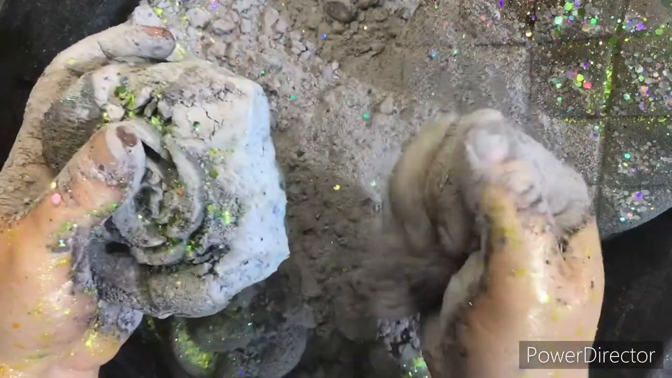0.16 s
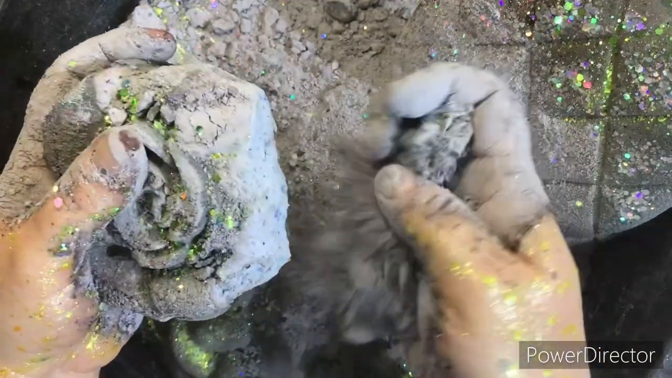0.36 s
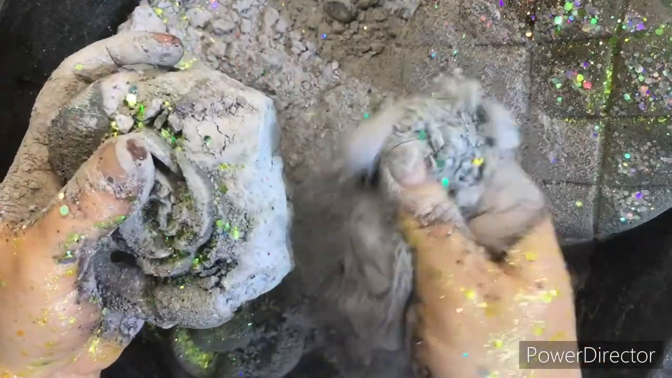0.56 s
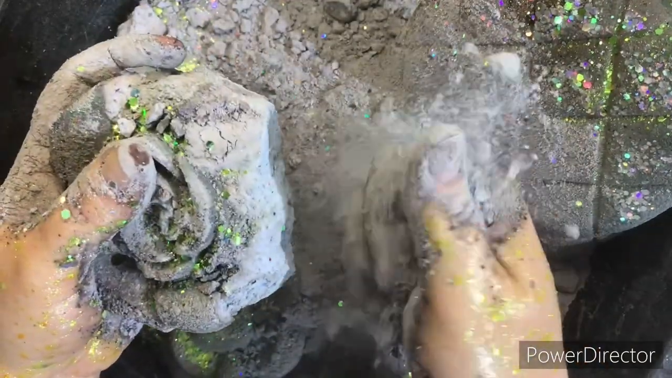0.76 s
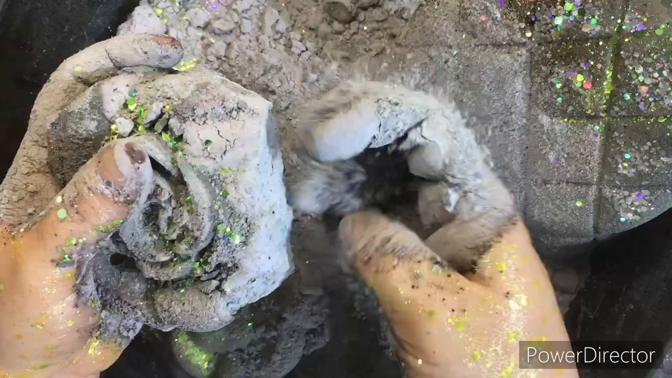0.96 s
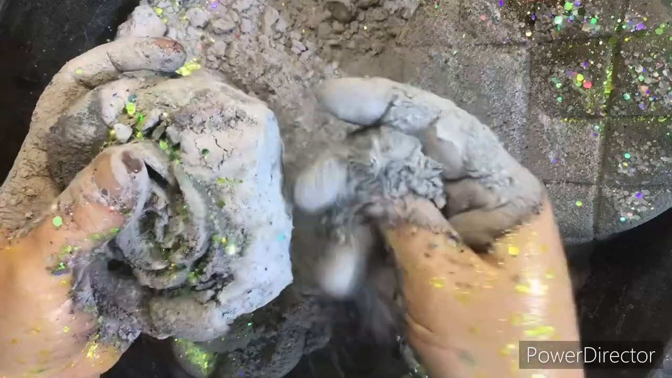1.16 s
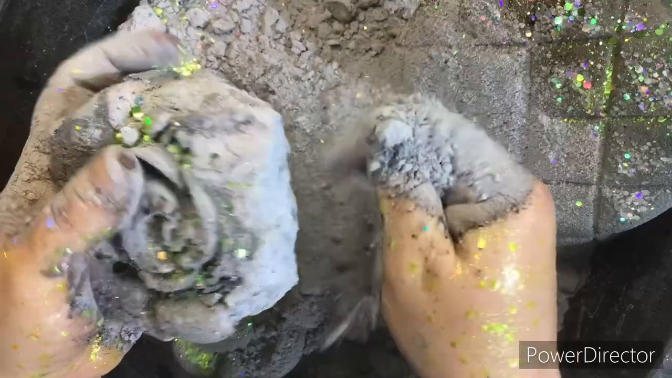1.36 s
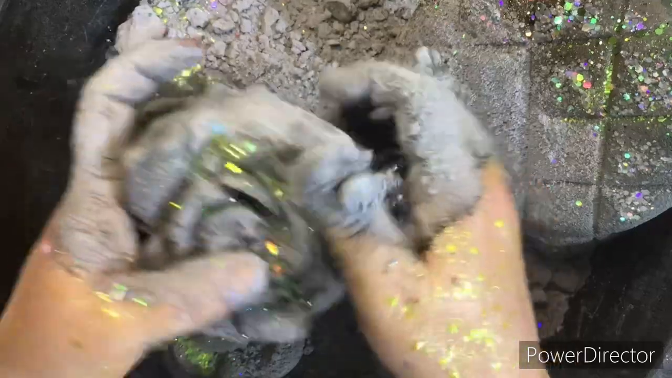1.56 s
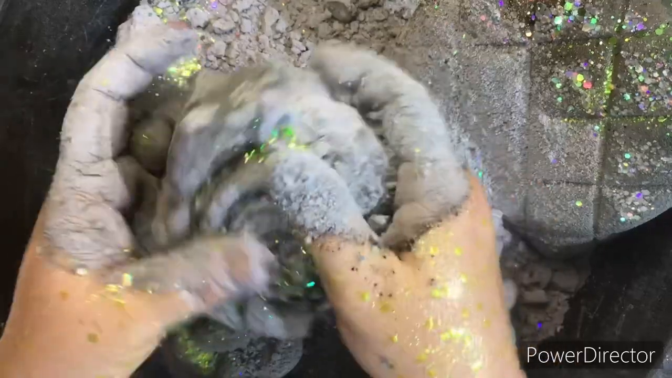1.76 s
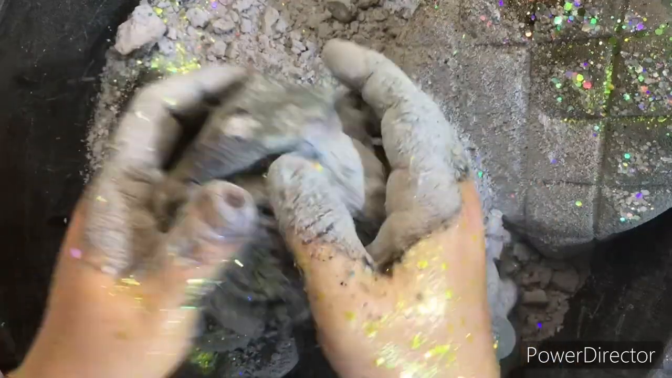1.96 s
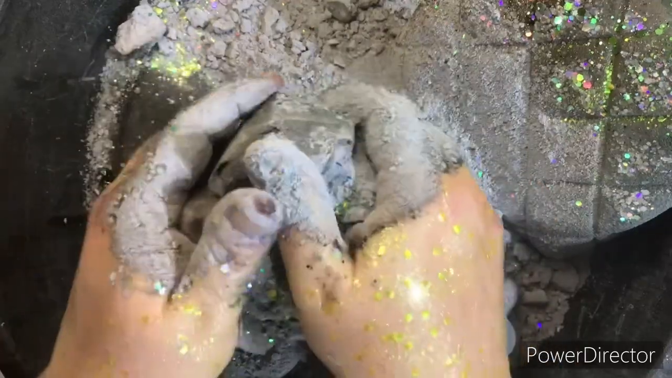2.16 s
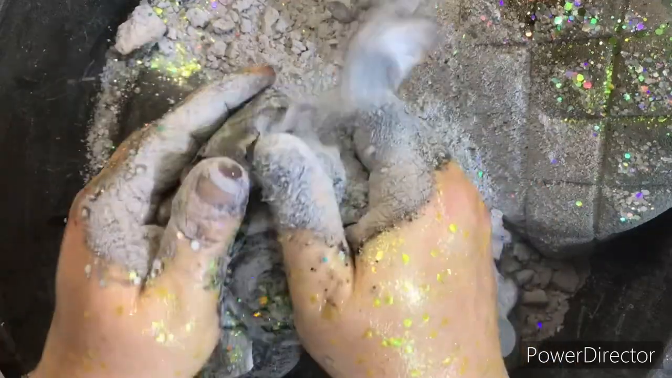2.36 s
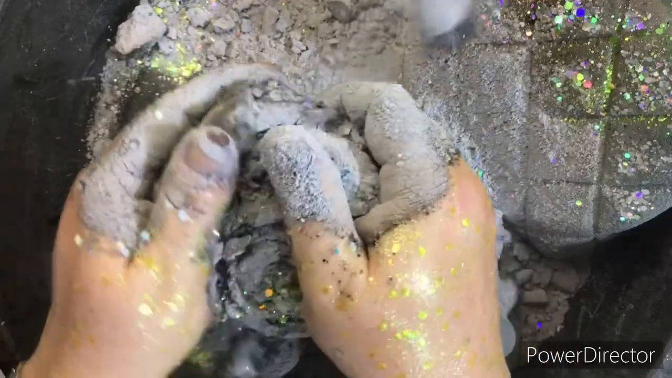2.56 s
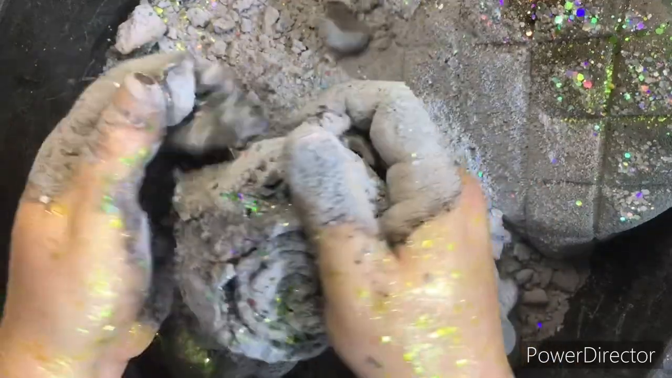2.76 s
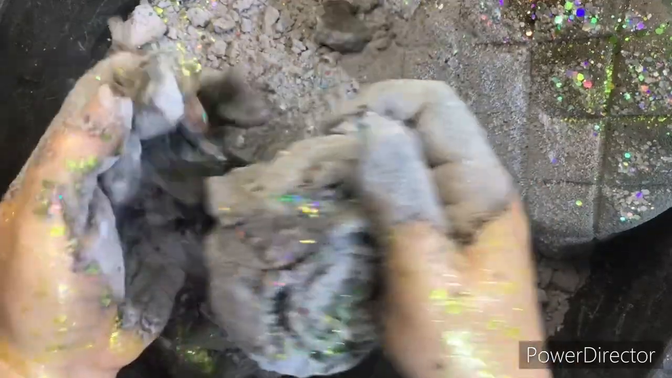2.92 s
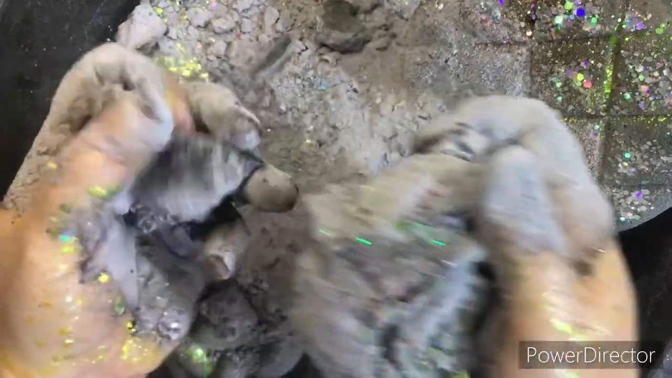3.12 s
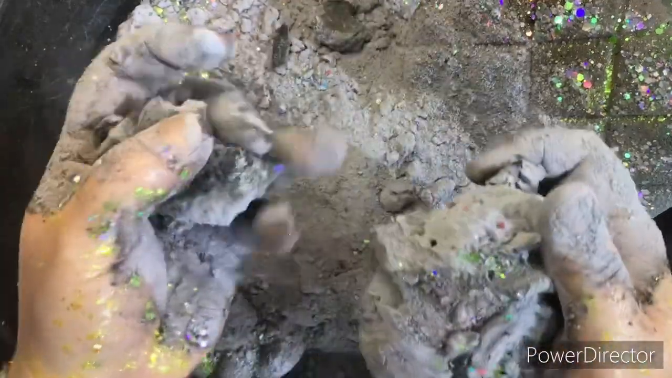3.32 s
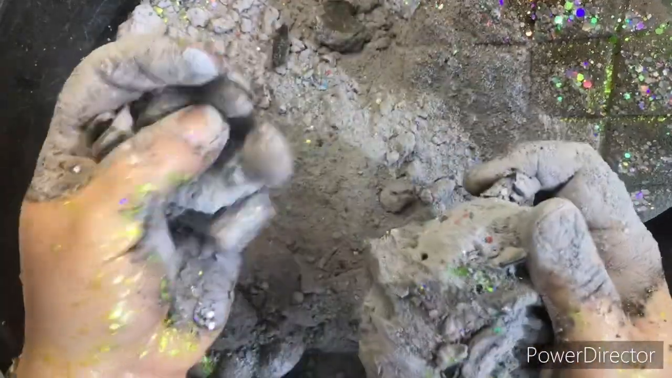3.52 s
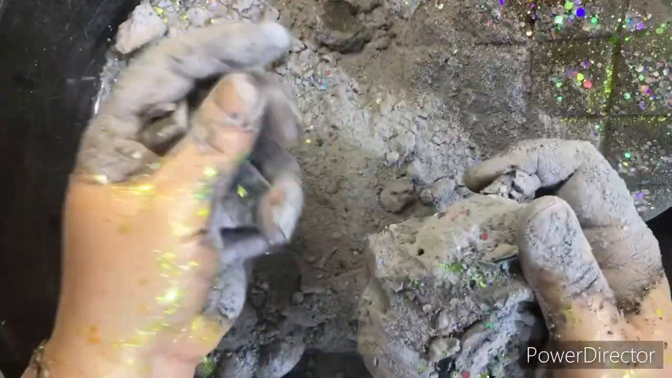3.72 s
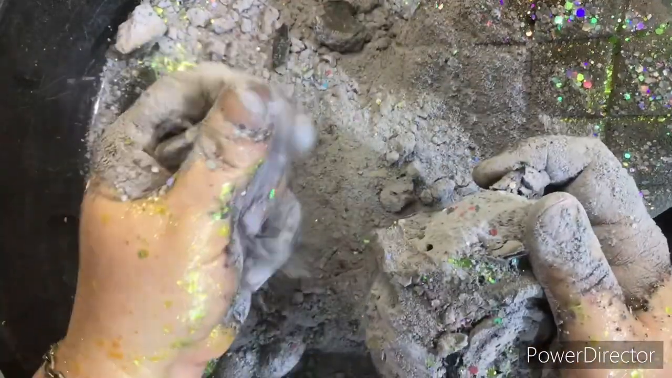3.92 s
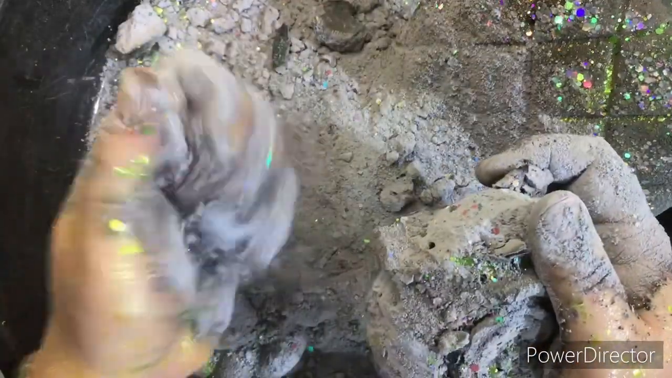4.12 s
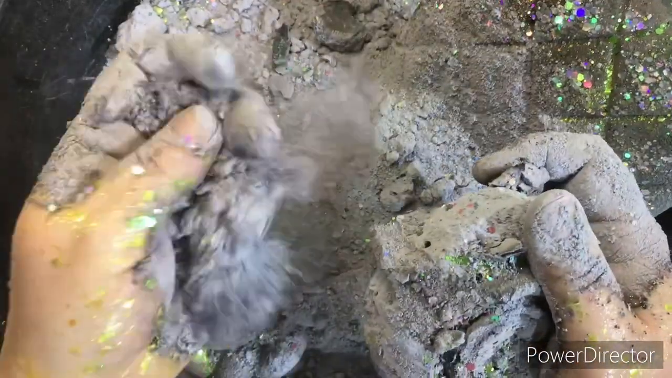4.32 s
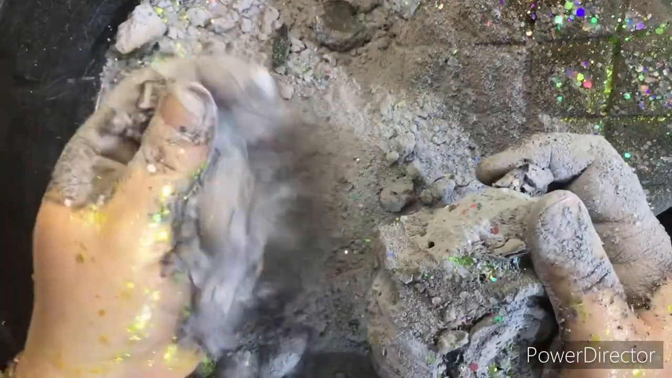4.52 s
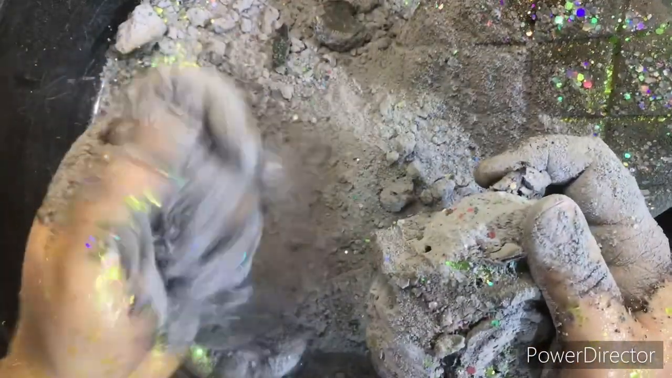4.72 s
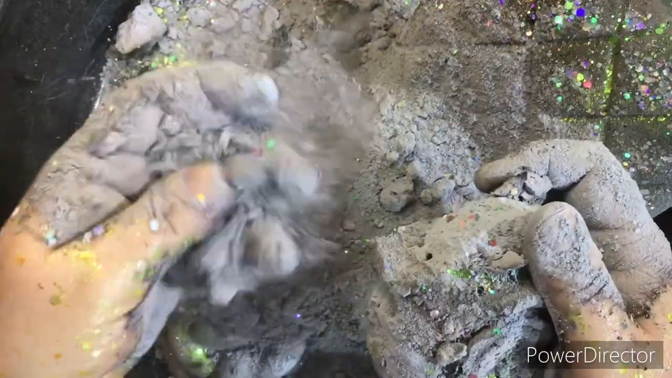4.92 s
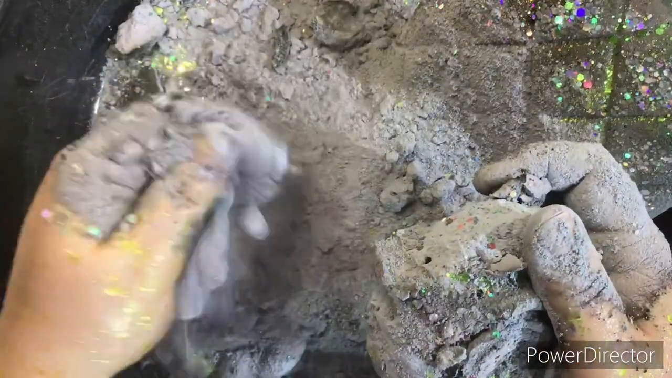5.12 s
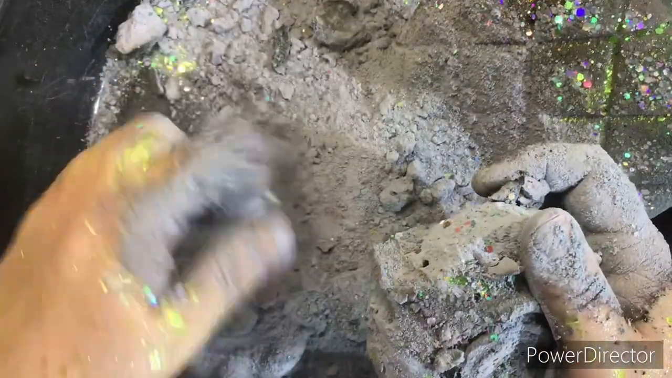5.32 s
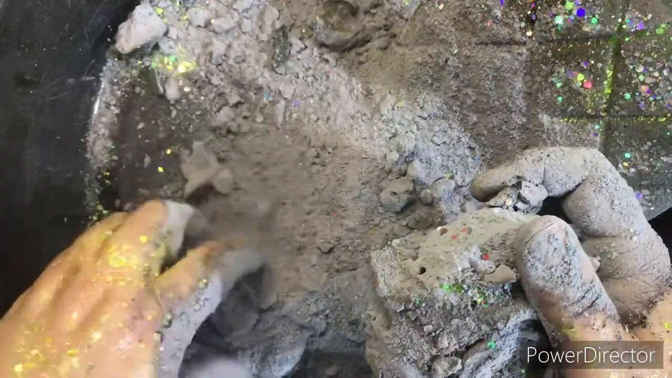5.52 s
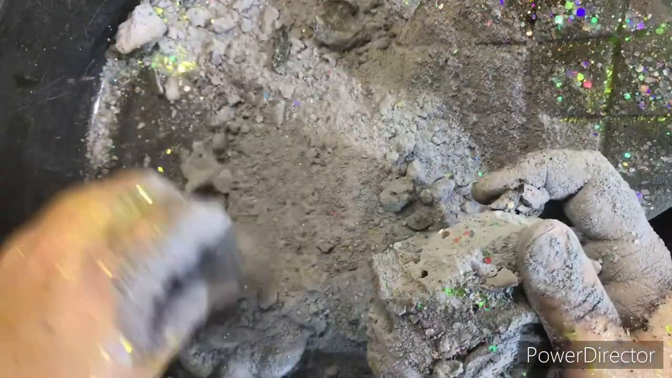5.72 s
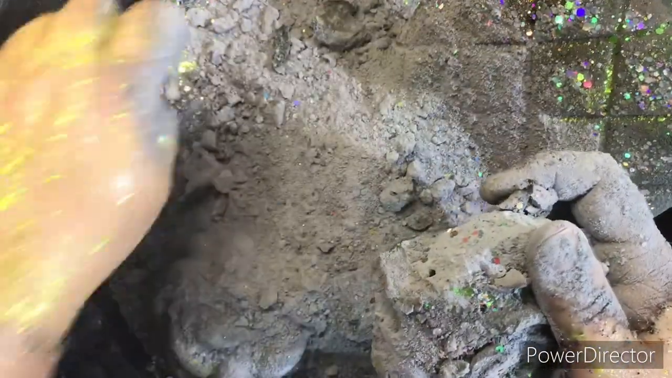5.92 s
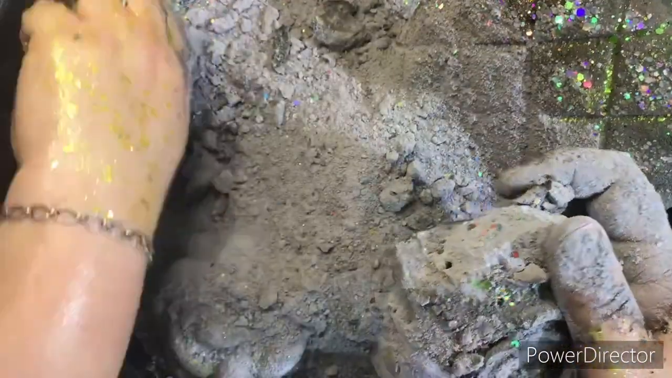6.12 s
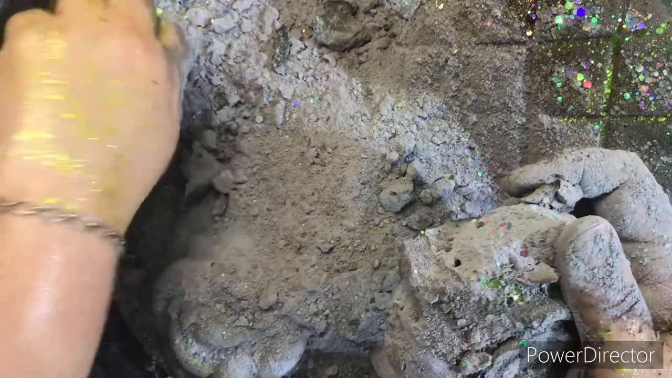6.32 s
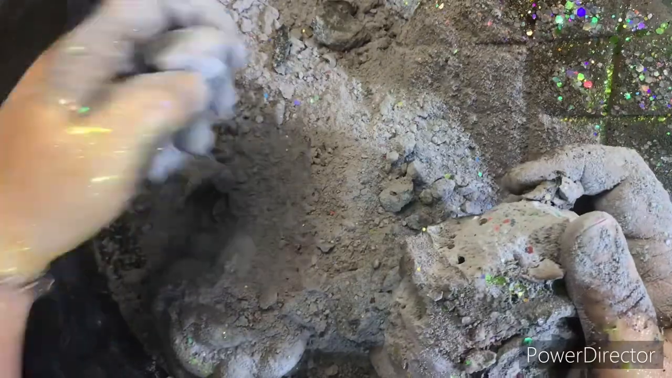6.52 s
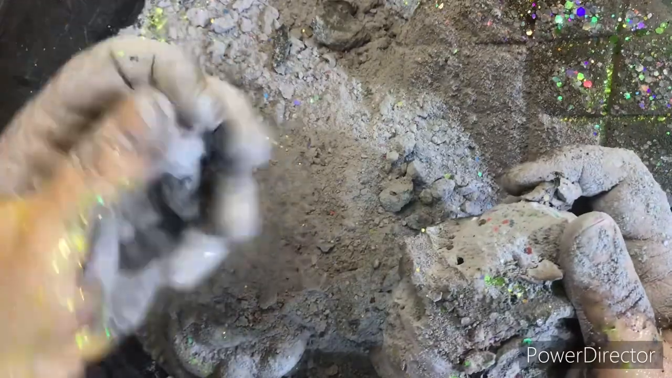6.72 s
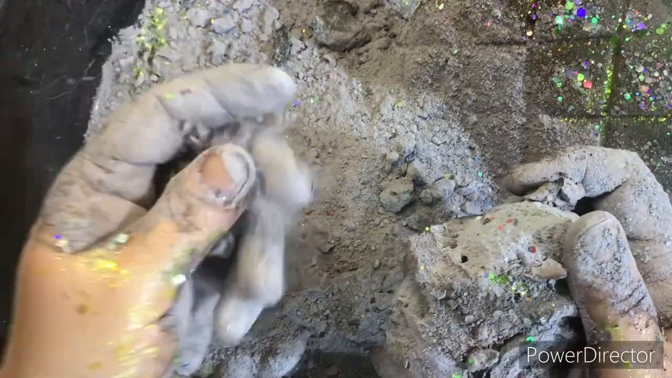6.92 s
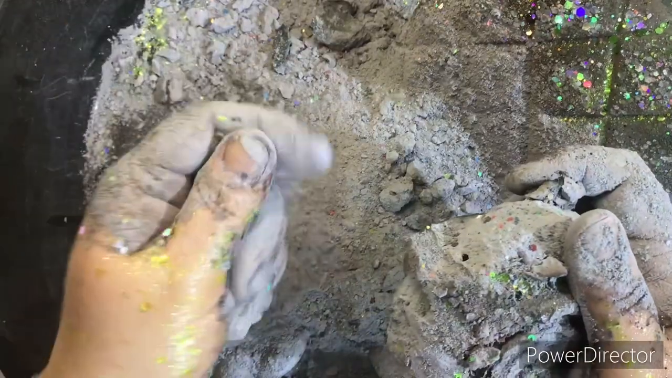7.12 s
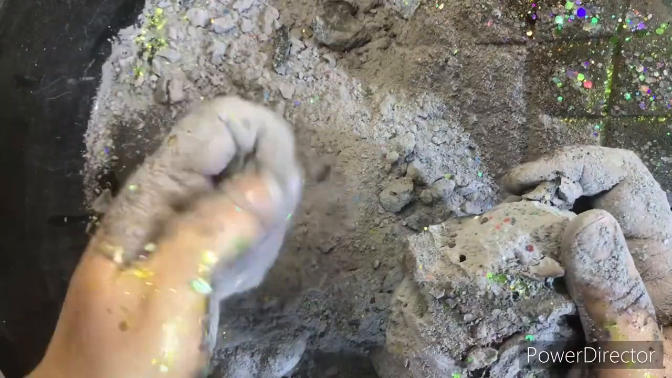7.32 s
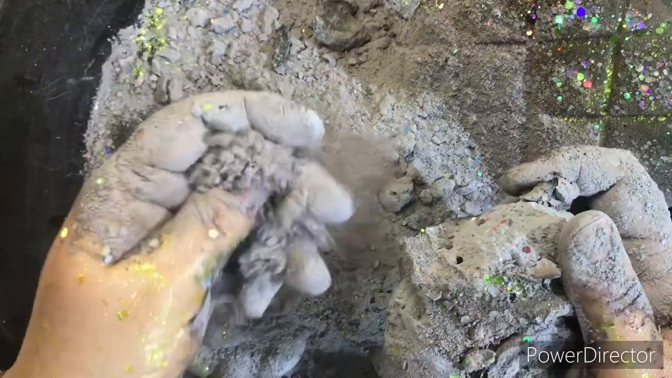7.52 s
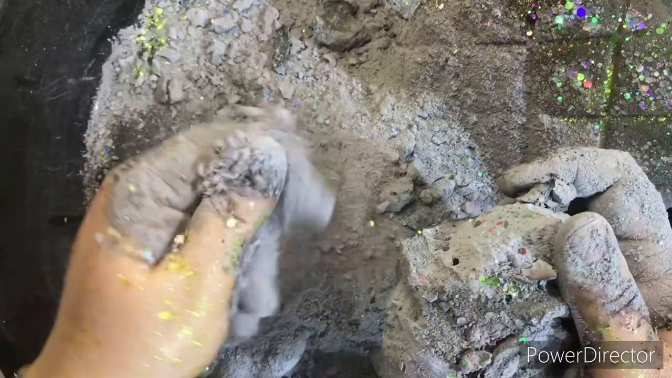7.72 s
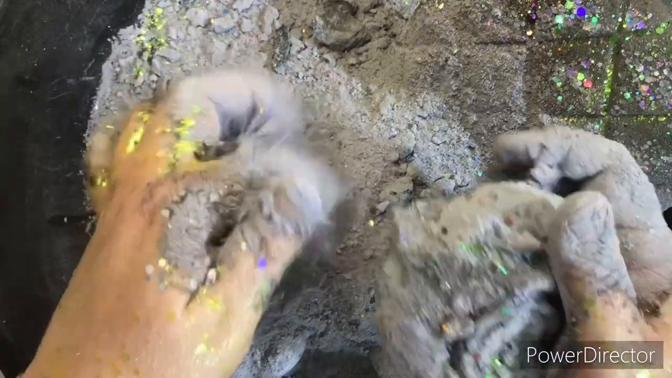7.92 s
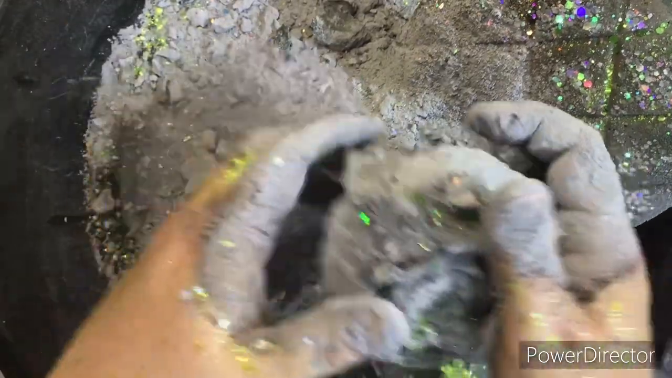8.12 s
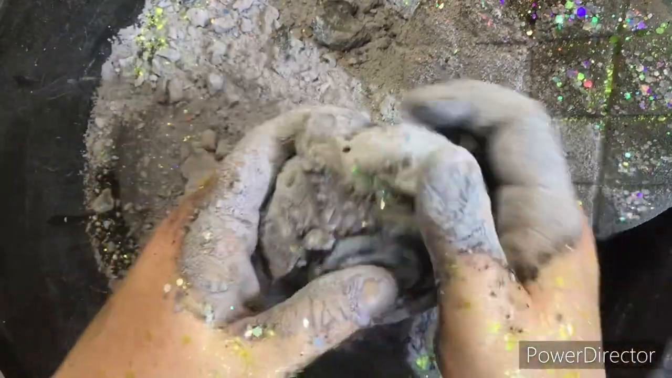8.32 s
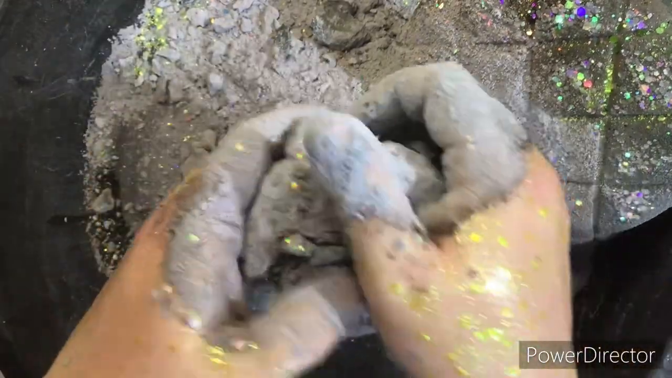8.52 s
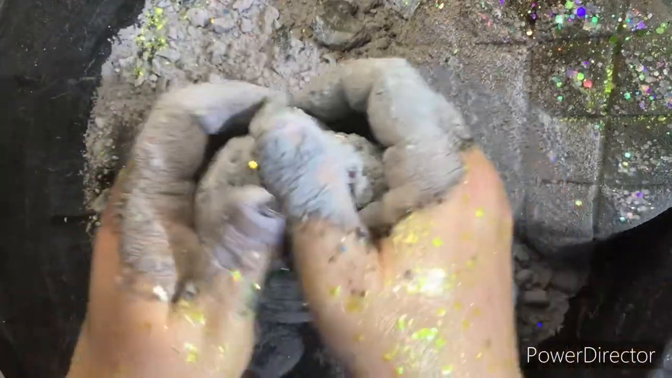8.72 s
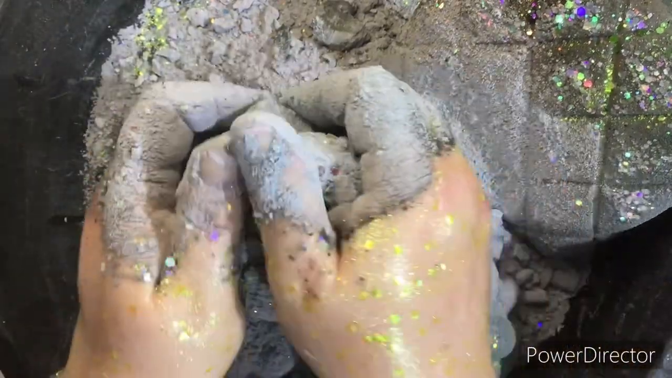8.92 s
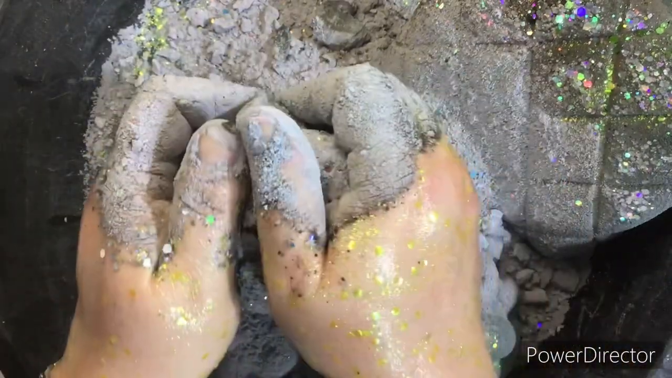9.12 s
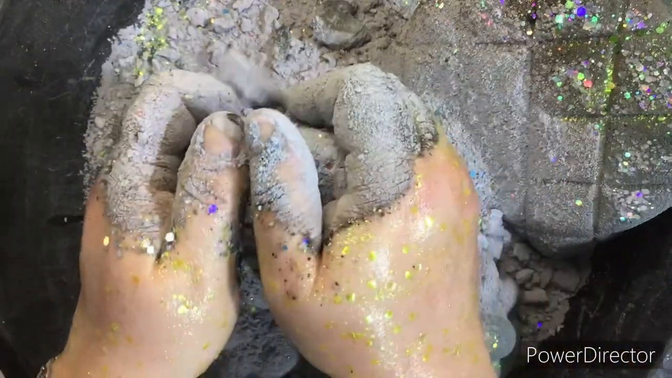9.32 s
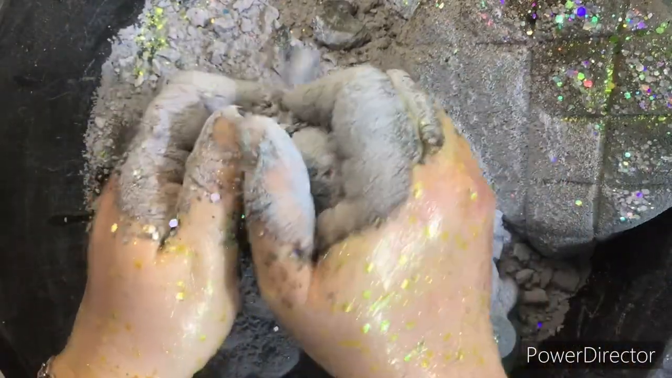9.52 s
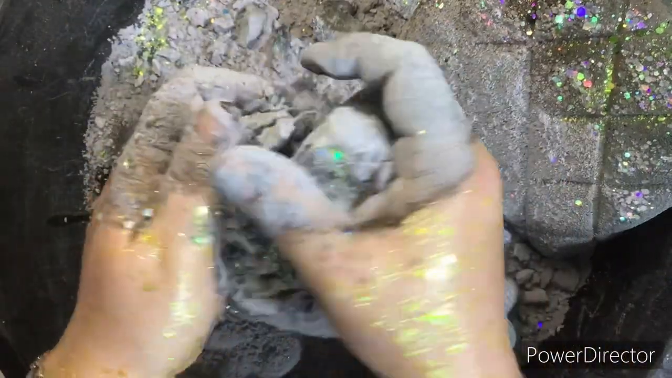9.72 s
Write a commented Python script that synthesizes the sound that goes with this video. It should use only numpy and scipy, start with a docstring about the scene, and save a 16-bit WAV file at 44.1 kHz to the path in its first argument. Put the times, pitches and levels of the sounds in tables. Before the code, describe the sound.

A close recording in a small, quiet room with a faint bassy background. From 0 to 2 seconds, hands squeeze dry chalk with soft gritty crunches, dull snaps around 0.45 and 1.3, and light finger swishes from 1.4. At about 2.5 a large lump breaks in a tight burst of very loud, clipped cracks, with a hollow tub boom; more strong cracks follow at 2.8 and 3.1, shedding crumbs, then a snap at 3.7. From 3.8 to 4.8 it is mostly gentle crumbling. Around 4.9 to 5.7, a longer squeeze crackles with sharper snaps near 5.2, 5.3 and 5.55. A low tub thump comes at 6.15. From 6.4 to 7.9, quiet powdery rubbing and pattering grains continue. Small crunches and swishes appear around 8 to 8.7, then near-quiet, before a brief cluster of clicks and a soft bump at 9.4 and fading crumbs.

```python
"""In a small quiet room, two hands crush dry chalk lumps over a plastic tub of powder, close to the microphone.
Each squeeze grinds crumbs, grit and powder, made of random ticks and noise in three colours. Lumps snap as
short filtered clicks, crunch in runs of ticks, and shed a trickle of debris; the largest ring. Bands of noise
make skin sliding on chalk and tub, high swishes and a low judder, and loose bits tick as short fading tones.
Knocks and leaning hands make the tub boom by ringing its low tones; a steady background lies beneath."""
import sys
import numpy as np
from scipy import signal
from scipy.fft import rfft, irfft, next_fast_len
from scipy.io import wavfile

SR = 44100
rng = np.random.default_rng(int(sys.argv[2]) if len(sys.argv) > 2 else 0)


def dump(signal):
    """Clip the signal to [-1, 1] and save it as 16-bit WAV at the path in sys.argv[1]."""
    limited = np.clip(np.atleast_2d(signal).T, -1, 1)
    pcm = np.round(limited * 32767).astype(np.int16)
    wavfile.write(sys.argv[1], SR, pcm)


N = 435266
TIME = np.arange(N) / SR

# Lumps snapping or landing. Each row: start in seconds, level over 10 ms in dB (before a small
# shared lift), pitch in Hz, dullness in dB lost per octave above the pitch.
LUMP_BREAKS = [(0.0467, -34, 2360.0, 10), (0.076, -39, 3020, 19), (0.13, -38.5, 4700.0, 14),
               (0.3942, -31.5, 2090, 41), (0.412, -36.5, 1700.0, 26.0), (0.4474, -23, 1760, 32.5),
               (0.48, -36, 560.0, 6.5), (0.5293, -29.5, 2150.0, 33), (0.5826, -30.5, 1580, 25.0),
               (0.6036, -28.5, 2230, 25), (0.7143, -33, 800.0, 9.5), (0.773, -39.0, 1300.0, 28.0),
               (0.8328, -36, 473, 7.5), (0.8592, -39, 4000.0, 18), (0.9046, -36.0, 2340.0, 16),
               (1.1134, -39.0, 1200.0, 11), (1.255, -33, 750.0, 15), (1.3123, -21.5, 1960.0, 31),
               (1.576, -35.5, 7600, 40), (1.6077, -39, 890, 8), (1.6641, -38, 4700, 39),
               (1.8255, -36.5, 6310.0, 21), (1.954, -32.5, 2250, 34), (1.9615, -26.5, 2660, 30),
               (2.296, -34.0, 3440.0, 11.5), (2.309, -27, 2780.0, 7), (2.322, -27, 5530, 12),
               (2.409, -35, 720.0, 5.0), (2.487, -10, 1200, 7.5), (2.495, -8.5, 510.0, 12),
               (2.507, -13.5, 1360.0, 11.5), (2.5452, -7.5, 860.0, 7.5), (2.5587, -12, 670, 4.5),
               (2.7566, -15.5, 590, 8.5), (2.8057, -20, 1860, 16.5), (2.8878, -32.5, 3320, 9.5),
               (2.9841, -15, 5600, 17.5), (3.028, -27, 5660, 10.5), (3.0824, -8.5, 2520, 9.5),
               (3.1458, -33, 840.0, 4), (3.1776, -28.5, 9410.0, 2.0), (3.49, -39, 826, 8.0),
               (3.576, -26, 6300.0, 7.5), (3.654, -21.0, 2380, 13.5), (3.6714, -16.5, 2200, 14),
               (3.6792, -27, 1930.0, 12.0), (3.7605, -35, 5850.0, 15), (4.3763, -39, 1160.0, 10.0),
               (4.4557, -37.5, 900, 3.0), (4.6588, -36, 2420.0, 16), (4.681, -37, 1880, 18),
               (4.844, -22.0, 2900, 19.5), (4.8854, -35.5, 4210.0, 15.5), (4.9339, -24.0, 1125, 2.0),
               (4.9906, -30.5, 1880.0, 6), (5.002, -31.5, 4970.0, 20), (5.0302, -35.0, 4700.0, 15),
               (5.072, -35.5, 1040.0, 19), (5.1505, -32, 3550.0, 34), (5.1616, -26.5, 2960.0, 16),
               (5.1849, -25, 2700, 51), (5.235, -33.5, 1670, 12.0), (5.3115, -15, 4460, 18),
               (5.3721, -29.5, 2450.0, 18), (5.408, -32, 1200.0, 0.5), (5.4545, -31, 5500.0, 26),
               (5.4916, -35.5, 320.0, 7), (5.5616, -19.5, 3600, 9.5), (5.694, -34, 3280, 11),
               (5.8175, -28.5, 1790, 16.5), (6.0198, -39.5, 5560, 14), (6.0834, -36.5, 2830.0, 13),
               (6.142, -33.5, 483, 18), (6.1614, -31.5, 2610.0, 16), (6.1796, -29, 6800, 33),
               (6.2925, -44, 480.0, 13), (6.379, -39.0, 3570.0, 5), (6.4168, -38, 7960.0, 28),
               (6.9103, -39, 3110.0, 10), (7.2244, -34, 1104, 16), (7.7291, -35, 2190, 16),
               (7.987, -31.5, 320.0, 0), (8.049, -35, 1700, 23), (8.0661, -23.5, 8250.0, 13),
               (8.662, -36, 2040.0, 35), (8.6693, -35.5, 1800.0, 18), (9.2379, -40, 7280.0, 44),
               (9.4035, -28.5, 3470.0, 14), (9.4184, -27, 1450.0, 11.5), (9.4249, -26, 1580.0, 9)]
# Bands of noise: skin sliding on chalk or along the tub; the two near 117 Hz are a low judder. # Each row:
# start in seconds, length in seconds, level at the middle in dB (before its unevenness), # centre in Hz, width
# as upper edge over centre (raised to 1.1 if smaller).
SKIN_SLIDES = [(.2, 0.23, -36, 117.4, 1.17), (.55, 0.36, -42, 116.5, 0.91),
               (1.39, 0.15, -39.5, 5650, 1.65), (1.733, 0.23, -41, 3900, 1.84),
               (2.024, 0.089, -37.5, 4000, 1.9), (3.259, 0.24, -46, 735, 1.16),
               (7.745, 0.15, -50, 4470, 1.9), (8.295, 0.17, -43, 3900, 1.93),
               (8.55, 0.3, -47.5, 3480, 1.84)]


def undb(db):
    """Turn decibels into a gain."""
    return 10 ** (np.asarray(db) / 20)


def unit(x):
    """Scale a sound to an rms level of 1."""
    return x / np.sqrt(np.mean(x ** 2) + 1e-20)


def curve(table):
    """Draw straight lines through (seconds, value) points, one value per sample."""
    s, values = np.transpose(table)
    return np.interp(TIME, s, values)


def add(out, s, x):
    """Mix x into out, starting at s seconds."""
    i = max(int(s * SR), 0)
    out[i:i + len(x)] += x[:max(N - i, 0)]


def fade_60db(t, t60):
    """Fade the way a struck thing does: by 60 dB in t60 seconds."""
    return np.exp(-np.log(1000) * t / t60)


def arch(t, length):
    """Rise and fall smoothly over length seconds, as half a sine wave."""
    return np.sin(np.pi * np.clip(t / length, 0, 1))


def band(x, lo_hz, hi_hz, order=2):
    """Keep only the pitches between two edges."""
    edges = [lo_hz, min(hi_hz, .47 * SR)]
    return signal.sosfilt(signal.butter(order, edges, "band", fs=SR, output="sos"), x)


def colour(x, points):
    """Shape the spectrum of x through (Hz, dB) points, thinning out beyond both ends, at rms 1."""
    hz, db = np.transpose(points)
    size = next_fast_len(len(x))
    f = np.maximum(np.fft.rfftfreq(size, 1 / SR), 1)
    skirts = np.minimum(f / hz[0], 1) ** 2 * np.minimum(hz[-1] / f, 1) ** 2
    gain = skirts * undb(np.interp(np.log(f), np.log(hz), db))
    return unit(irfft(rfft(x, size) * gain, size)[:len(x)])


def minimum_phase(gain_db):
    """Make the response with this spectrum whose energy comes as early as possible."""
    cepstrum = irfft(gain_db * np.log(10) / 20)
    half = len(cepstrum) // 2
    # folding the second half onto the first keeps the response from starting early
    folded = np.r_[cepstrum[0], 2 * cepstrum[1:half], np.zeros(half)]
    return irfft(np.exp(rfft(folded)))


def walk(turns_per_s):
    """Wander at random around 0, mostly within 1 either way."""
    knots = rng.standard_normal(turns_per_s * N // SR + 2)
    return np.interp(TIME * turns_per_s, np.arange(len(knots)), knots)


def ticks(size, per_s, spread_db):
    """Random tiny fractures: many small, a few large."""
    happens = rng.random(size) < per_s / SR
    strength = undb(spread_db * np.minimum(rng.exponential(size=size), 4.5))
    return happens * strength * rng.choice([-1, 1], size)


def slips(per_s, slip_s):
    """Grains let go in little avalanches: each starts at once and dies in milliseconds."""
    starts = np.abs(ticks(N, per_s, spread_db=3))
    activity = signal.lfilter([1], [1, -np.exp(-1 / (slip_s * SR))], starts)
    return activity / activity.mean()


def grinding():
    """Crumb, grit and powder levels in dB: the rustle, plus every squeeze, plus the debris of every crack."""
    # A hand closing on chalk. Each row: start in seconds, length in seconds, level in dB before
    # each grain size is trimmed, fineness in dB (more powder and fewer crumbs).
    squeezes = [(0.0, 0.034, -42.5, 4), (0.226, 0.046, -46, -0.5), (0.438, 0.23, -50.5, -8.5),
                (0.815, 0.087, -53, -2), (1.118, 0.26, -56, -6), (1.446, 0.061, -46, 5),
                (1.735, 0.21, -55.5, 10), (1.98, .12, -48.5, 5), (2.232, 0.077, -44, -5),
                (2.444, 0.37, -45.5, 1.5), (2.987, 0.18, -47, -6.5), (3.34, 0.097, -46, 1.5),
                (3.508, 0.33, -48, 4), (4.178, 0.077, -58, 14), (4.328, 0.22, -49, -3),
                (4.618, 0.21, -56.5, -9.5), (4.917, 0.22, -52.5, -6.5), (5.125, 0.53, -43.5, -0.5),
                (5.763, 0.084, -58.5, -13.5), (6.079, 0.228, -47, -1.5), (6.698, 0.066, -52.5, 7.5),
                (6.895, 0.05, -48.5, -3), (7.023, 0.086, -49, 0.5), (7.154, 0.13, -50.5, 8.5),
                (7.32, 0.029, -51.5, 7.5), (7.438, 0.21, -57, -2.5), (7.59, 0.31, -48.5, 4),
                (7.96, 0.17, -44.5, -2.5), (8.352, 0.13, -52.5, -3), (8.667, 0.078, -51, 4),
                (9.405, 0.053, -40.5, -0.5), (9.508, 0.086, -54.5, -7.5), (9.652, 0.27, -53, -7)]
    # Faint rustle of chalk between the fingers. Each row: time in seconds,
    # level in dB before a shared trim.
    rustle = [(0.18, -49.5), (0.92, -48.5), (1.0, -55), (1.1, -47.5), (1.4, -46.5), (1.56, -52),
              (1.75, -47), (2.17, -51.5), (2.8, -41.5), (3.25, -49.5), (3.9, -47.5), (4.08, -52.5),
              (4.8, -51), (5.5, -51.5), (5.73, -50.5), (6.38, -57), (6.56, -66.5), (6.84, -62),
              (7.0, -54.5), (7.41, -60), (8.28, -53), (8.85, -54), (9.13, -63.5), (9.33, -58.5),
              (9.55, -51.5)]
    rustle_trim_db = -1
    grip_s, release_s = .02, 0.01  # the grip builds, then lets go
    debris_db, debris_fine_db, debris_t60_s = -28.5, 2.5, 0.17  # level is against the crack

    t = TIME[:SR]
    spills = []  # each: start in seconds, strength over time, fineness in dB
    for s, db, _, _ in LUMP_BREAKS:
        trickle = undb(db + debris_db - 60 * t / debris_t60_s)
        spills.append((s, trickle, debris_fine_db))
    for s, length, db, fine_db in squeezes:
        grip = np.minimum(t / grip_s, 1) * np.exp(-np.maximum(t - length, 0) / release_s)
        spills.append((s, grip * undb(db), fine_db))
    spills.append((0, undb(curve(rustle) + rustle_trim_db), 0))

    power = np.zeros((3, N))
    for s, flow, fine_db in spills:
        # fineness takes from the crumbs, leaves the grit and adds to the powder
        for row, share in zip(power, undb(np.array([-1, 0, 1]) * fine_db)):
            add(row, s, (share * flow) ** 2)
    return 10 * np.log10(power)


def grains(points, per_s, spread_db, smooth, flicker_db, slips_per_s):
    """Grains of all pitches over the smooth rub of fine dust; each octave slips in its own bursts."""
    broad = unit(ticks(N, per_s, spread_db))
    bursts = np.zeros(N)
    for hz in 250 * 2. ** np.arange(6):
        slipping = rng.standard_normal(N) * slips(slips_per_s, slip_s=0.0021)
        bursts += band(slipping, hz, 2 * hz)
    dust = smooth * rng.standard_normal(N)
    sound = broad + 1.6 * unit(bursts) + dust
    return colour(sound, points) * undb(flicker_db * walk(turns_per_s=45))


def crumbling(levels):
    """Coarse crumbs patter sparsely, grit crackles and powder hisses, each following its own level."""
    # Colours of the three grain sizes. Each row: pitch in Hz, relative level in dB.
    crumb_colour = [(140, -4), (300, 0.5), (490, 1), (850, -6), (1600, -6.5), (2400, -8), (3500, -9)]
    grit_colour = [(1600, -8.5), (2500, -7), (3700, -8), (5200, -9), (6900, -9.5), (8800, -14),
                   (12000, -26.5)]
    powder_colour = [(5500, -8.5), (7400, -4.5), (9500, -12), (13000, -7.5), (16000, -15.5)]

    crumb_db, grit_db, powder_db = levels
    # while a finger slides on the chalk (the bands above 1000 Hz), the grit dips by up to 4 dB per slide
    sliding = sum(arch(TIME - s, length) for s, length, _, hz, _ in SKIN_SLIDES if hz > 1000)
    crumbs = grains(crumb_colour, per_s=210, spread_db=0.5, smooth=0.7, flicker_db=3.0, slips_per_s=150)
    grit = grains(grit_colour, per_s=330, spread_db=2.5, smooth=0.75, flicker_db=1.5, slips_per_s=220)
    powder = grains(powder_colour, per_s=600, spread_db=3.5, smooth=0.66, flicker_db=-0.1, slips_per_s=550)
    crumbs = crumbs * undb(crumb_db - 2.0)
    grit = grit * undb(grit_db - 4 * sliding)
    powder = powder * undb(powder_db - 5.0)
    return crumbs + grit + powder


def tub(grit_db):
    """Soft pushes and fumbling hands ring the tub's low tones; now and then the whole tub rocks."""
    # The tub and its bed of powder. Each row: pitch in Hz, relative level in dB,
    # time to fall by 60 dB in seconds.
    tub_tones = [(64.84, -4, 0.61), (84, -1, 0.32), (127, -2, 0.21), (172.7, -18.5, 0.074),
                 (211, -12, 0.21), (257.1, -13.5, 0.12)]
    # Heavy contacts with the tub. Each row: start in seconds, peak level in dB, push length in seconds.
    thumps = [(0.449, -27, 0.006), (0.773, -38, 0.0019), (1.124, -27, .005), (2.306, -22, 0.013),
              (2.491, -12.5, 0.0006), (2.511, -8, 0.0012), (2.557, -12, 0.0058), (2.808, -18.5, 0.0048),
              (2.993, -25.5, 0.0067), (3.158, -25, 0.0096), (3.67, -33, 0.0021), (5.601, -26, 0.0068),
              (5.635, -20, 0.0048), (6.164, -13.5, 0.0048), (8.062, -30.5, 0.011), (9.444, -25.5, 0.013)]
    # Low boom under the leaning hands. Each row: time in seconds, level in dB before a shared trim.
    lean = [(0.0, -40), (0.3, -45.5), (0.47, -31), (0.79, -42.5), (2.09, -49), (2.69, -33), (3.49, -48),
            (5.0, -47.5), (5.63, -40), (5.97, -45), (6.35, -42.5), (6.57, -54.5), (7.48, -51), (8.19, -46),
            (9.02, -55.5), (9.23, -46), (9.57, -42), (9.87, -44.5)]
    # The whole tub rocking under the hands. Each row: start in seconds, length in seconds,
    # level at the middle in dB.
    rocks = [(1.702, .8, -40), (5.5, 0.47, -40), (6.085, .3, -33.5), (9.195, 0.73, -34)]
    lean_trim_db, squeeze_boom_db = -1.5, -5.5  # every squeeze also pushes on the tub
    sway_db = -14  # deep sway against the push

    t = TIME[:SR]
    ring = sum(undb(db) * np.sin(2 * np.pi * hz * t) * fade_60db(t, t60) for hz, db, t60 in tub_tones)
    ring = band(ring, 50, 400)  # the small tub radiates little below its first tone
    knocks = np.zeros(N)
    for s, db, length in thumps:
        boom = signal.fftconvolve(ring, arch(t, length))[:SR]
        add(knocks, s, boom / np.abs(boom).max() * undb(db))

    push = np.hypot(undb(curve(lean) + lean_trim_db), undb(grit_db + squeeze_boom_db))
    ringing = unit(signal.fftconvolve(rng.standard_normal(N), ring)[:N])
    low_noise = unit(band(rng.standard_normal(N), 85, 150, order=3))
    fumble = unit(ringing + 0.36 * low_noise)

    rocking = sum(arch(TIME - s, length) * undb(db) for s, length, db in rocks)
    deep = unit(band(rng.standard_normal(N), 18, 31))
    return knocks + fumble * push + deep * (rocking + undb(sway_db) * push)


def background():
    """The room's steady background is noise that is strongest in the bass."""
    # Each row: pitch in Hz, relative level in dB.
    air_colour = [(20, -2.5), (100, -1), (250, -15), (500, -18.5), (900, -33), (2500, -39), (7000, -49),
                  (16000, -41)]
    return colour(rng.standard_normal(N), air_colour) * undb(-51.5)


def pebbles(crumb_db, grit_db, count=300, size=600):
    """Loose bits drop off the fingers, each a dull tick; small bits go with the grit, big with the crumbs."""
    centre_hz, octaves = 3000, 1.22  # pitches lie this many octaves either way
    peak_db, scatter_db = 21, 4.5  # level over the grinding, and its scatter either way
    cycles = 2.2  # until a tick has fallen 20 dB
    out, t = np.zeros(N), np.arange(size) / SR
    for when, pitch, weight in rng.uniform(-1, 1, (count, 3)):
        i = int((when + 1) / 2 * (N - 1))
        hz = centre_hz * 2 ** (octaves * pitch)
        tick = np.sin(2 * np.pi * hz * t) * undb(-20 * hz * t / cycles)
        grinding_db = np.interp(pitch, [0, 1], [crumb_db[i], grit_db[i]])
        add(out, i / SR, tick * undb(grinding_db + peak_db + scatter_db * weight))
    return out


def cracks(size=4096):
    """A break is a jolt and a short run of splinters; big lumps thud, thin flakes snap, each with its own tint."""
    # Resonances of the cupped hands and the tub that every crack passes through.
    # Each row: pitch in Hz, width in Hz, lift in dB.
    hollows = [(506, 120, 6.5), (704, 200, -1), (1250, 87, 0.5), (2000, 400, 1.5), (3160, 600, 0.5)]
    run_s, splinter = 0.003, 0.099  # splinters' fading time, and their strength against the jolt
    bass_db_per_octave = 6.5  # a lump radiates less and less below its pitch
    low_hz, high_hz = 190, 11500  # every crack thins out beyond these
    ripple_db, tint_points = 2, 36
    lift_db = 0.4  # shared by all cracks

    out, t = np.zeros(N), np.arange(size) / SR
    f = np.maximum(np.fft.rfftfreq(size, 1 / SR), 20)
    body_db = sum(db / (1 + (2 * (f - hz) / width) ** 2) for hz, width, db in hollows)
    body_db = body_db - 10 * np.log10(1 + (low_hz / f) ** 4 + (f / high_hz) ** 6)
    tint_log_hz = np.linspace(np.log(100), np.log(SR / 2), tint_points)
    for s, db, hz, dullness in LUMP_BREAKS:
        jolt = splinter * rng.standard_normal(size) * np.exp(-t / run_s)
        jolt[0] = 1
        tint_db = np.interp(np.log(f), tint_log_hz, ripple_db * rng.standard_normal(tint_points))
        # octaves away from the pitch, with a soft corner
        octaves_below = np.log2(1 + (hz / f) ** 4) / 4
        octaves_above = np.log2(1 + (f / hz) ** 4) / 4
        lump_db = tint_db - bass_db_per_octave * octaves_below - dullness * octaves_above
        click = irfft(rfft(jolt) * rfft(minimum_phase(body_db + lump_db)))
        # give the click the energy of 10 ms at its level
        click = click / np.linalg.norm(click) * np.sqrt(SR / 100)
        add(out, s, click * undb(db))
    return out * undb(lift_db)


def skin_slides(size=16000):
    """Slightly uneven bands of noise: high ones swish like sliding skin, the lowest are a low judder of skin on
    lump or tub."""
    uneven_db = 1.5
    out, t = np.zeros(N), np.arange(size) / SR
    for s, length, db, hz, width in SKIN_SLIDES:
        swell = arch(t, length) * undb(uneven_db * walk(turns_per_s=90)[:size])
        width = max(width, 1.1)
        noise = unit(band(rng.standard_normal(size), hz / width, hz * width, order=4))
        add(out, s, noise * swell * undb(db))
    return out


def crunches_and_dull_knocks(size=8000):
    """Dense ticks swell and stop: crunches as lumps collapse, and two dull knocks."""
    # Quick runs of tiny fractures as lumps give way; the two near 500-600 Hz are dull knocks.
    # Each row: start in seconds, length in seconds, level over that length in dB, centre in Hz.
    tick_runs = [(0.242, 0.065, -42.5, 10800), (0.61, 0.085, -44, 6250), (2.254, 0.021, -31.5, 3430),
                 (2.301, 0.032, -38, 5900), (2.471, 0.014, -24, 7000), (2.49, 0.11, -31, 1190),
                 (2.854, .015, -41, 5500), (3.025, 0.0048, -20.5, 4500), (3.211, .005, -38, 5000),
                 (3.397, .007, -38, 5500), (3.519, 0.019, -39, 5560), (3.57, 0.016, -28, 7000),
                 (4.391, 0.004, -39, 3500), (4.74, 0.0039, -35, 4200), (5.19, 0.011, -24.5, 2560),
                 (5.69, 0.0097, -32.5, 4950), (5.832, 0.019, -41, 7200), (6.138, 0.044, -40.5, 594),
                 (6.283, 0.031, -41, 514), (6.575, 0.0051, -51, 4970), (6.708, 0.11, -53.5, 7000),
                 (6.907, 0.014, -37, 4800), (7.066, .016, -39.5, 5560), (7.853, 0.027, -47, 8900),
                 (8.161, 0.056, -34.5, 5230), (8.379, .005, -40.5, 2600), (8.542, 0.045, -40, 6000),
                 (9.021, 0.0047, -42.5, 2800), (9.224, 0.012, -35, 4500), (9.386, 0.054, -35.5, 3480),
                 (9.411, 0.015, -33, 1700)]
    width = 1.4  # upper edge over centre
    out, t = np.zeros(N), np.arange(size) / SR
    for s, length, db, hz in tick_runs:
        swell = np.sqrt(np.maximum(arch(t, length), 0))
        swelling_ticks = ticks(size, per_s=5000, spread_db=5.0) * swell
        run = unit(band(swelling_ticks, hz / width, hz * width, order=1))
        # hold the level over the run's length, not over the whole buffer
        add(out, s, run * np.sqrt(length * SR / size) * undb(db))
    return out


def rings(size=3000):
    """The biggest pieces ring briefly as they break or land, one fast-fading tone each."""
    # Each row: start in seconds, pitch in Hz, starting level in dB, time to fall by 60 dB in seconds.
    big_pieces = [(.4475, 2270, -26, 0.0093), (1.3117, 1600, -20, 0.014), (2.4869, 1250, 5.5, 0.019),
                  (2.5451, 1240, -18, 0.016), (2.7562, 518, -10.5, 0.081), (3.0828, 3350, -7, .018),
                  (3.6708, 1940, -11.5, .022), (5.186, 1510, -10.5, 0.022)]
    out, t = np.zeros(N), np.arange(size) / SR
    for s, hz, db, t60 in big_pieces:
        add(out, s, np.sin(2 * np.pi * hz * t) * fade_60db(t, t60) * undb(db))
    return out


def room(x):
    """A small room adds a weak, blurred echo close behind each sound."""
    # The echo's colour. Each row: pitch in Hz, relative level in dB.
    echo_colour = [(100, -4), (250, 2.5), (420, -1.5), (650, -3.5), (950, -4.5), (1400, -4), (4000, -8.5),
                   (8000, -6.5), (11000, -7.5), (16000, -21.5)]
    t60_s, wet_db, first_s = 0.38, -15.0, .001
    t = TIME[:SR // 2]
    onset = np.clip(t / first_s - 1, 0, 1)  # silent until first_s, full at twice that
    tail = colour(rng.standard_normal(len(t)), echo_colour) * fade_60db(t, t60_s) * onset
    return x + undb(wet_db) * signal.fftconvolve(x, tail / np.linalg.norm(tail))[:N]


def scene():
    """Mix chalk, tub and background; only cracks, crunches, dull knocks and loose bits get the echo."""
    levels = grinding()
    crumb_db, grit_db, _ = levels
    breaks_and_bits = cracks() + crunches_and_dull_knocks() + pebbles(crumb_db, grit_db)
    close_sounds = room(breaks_and_bits) + rings() + crumbling(levels) + skin_slides()
    return (close_sounds + tub(grit_db) + background())[None]


def record(dry):
    """Peaks that overload the recorder are cut flat; then the top is cut."""
    top_hz = 15800
    low_pass = signal.ellip(8, .2, 70, top_hz, fs=SR, output="sos")
    return signal.sosfilt(low_pass, np.clip(dry, -1, 1))


dry = scene()
out = record(dry)
dump(out)
```